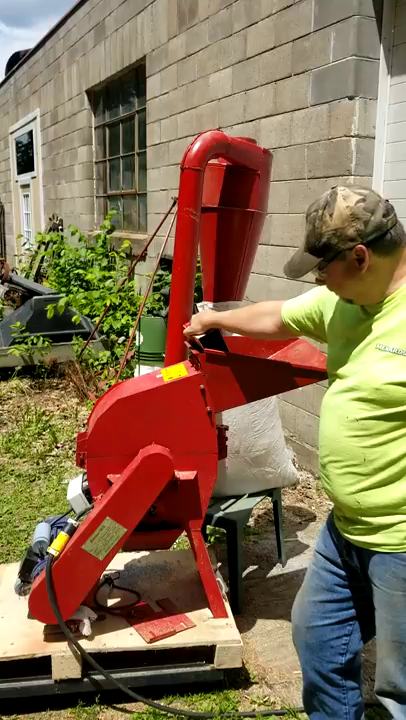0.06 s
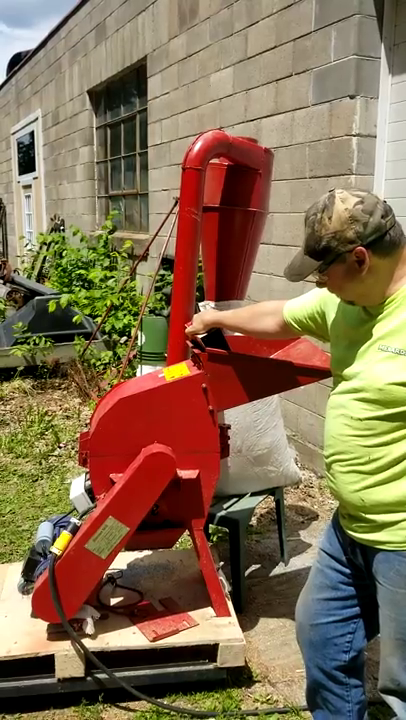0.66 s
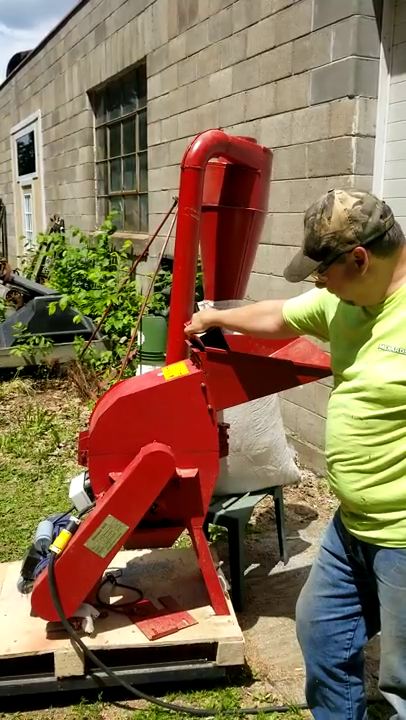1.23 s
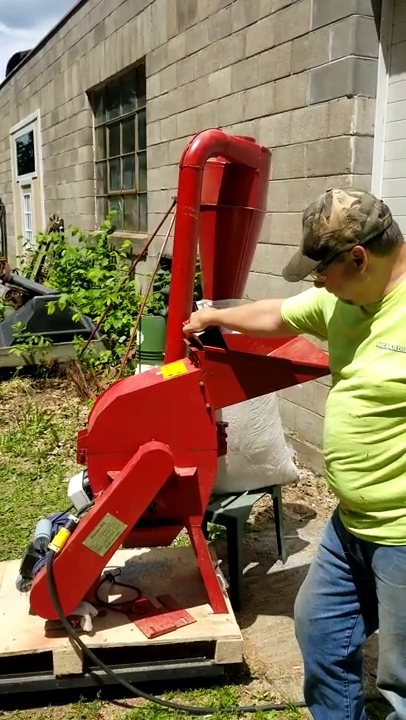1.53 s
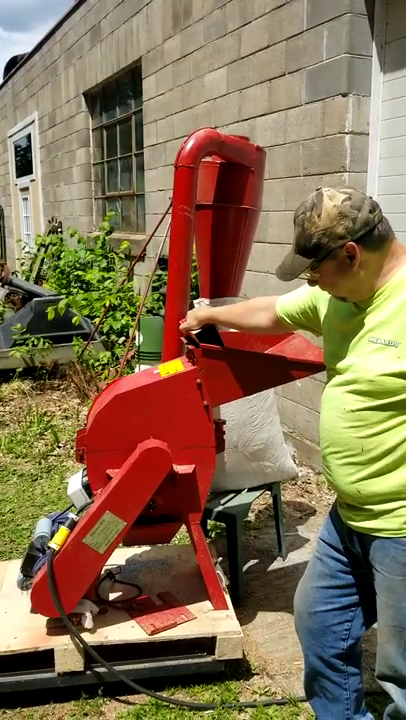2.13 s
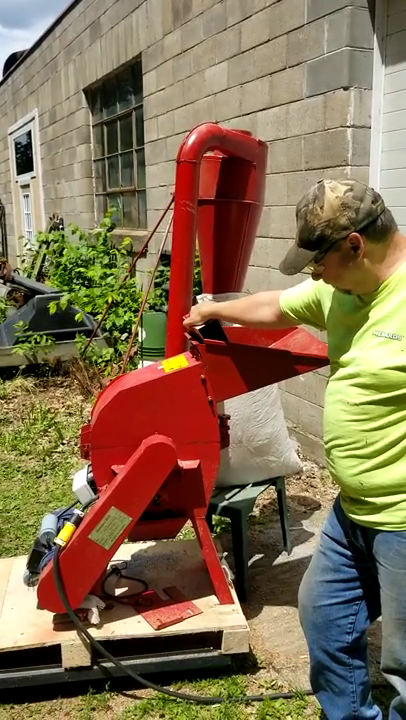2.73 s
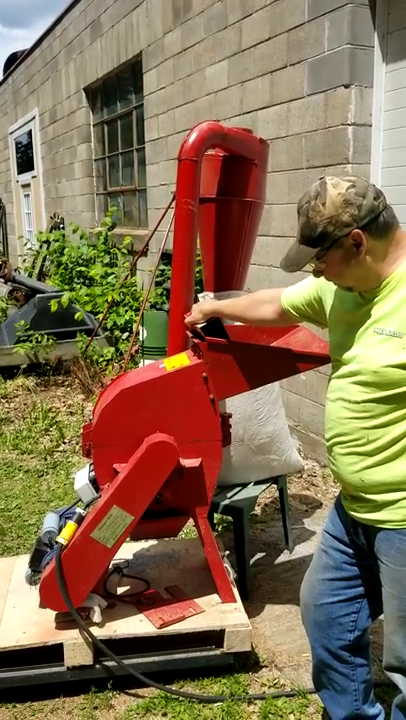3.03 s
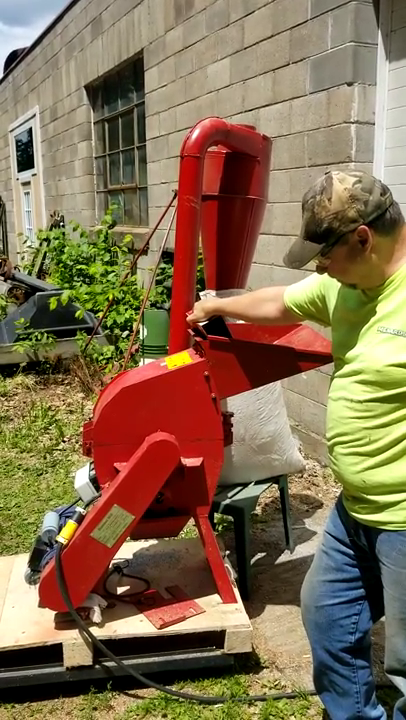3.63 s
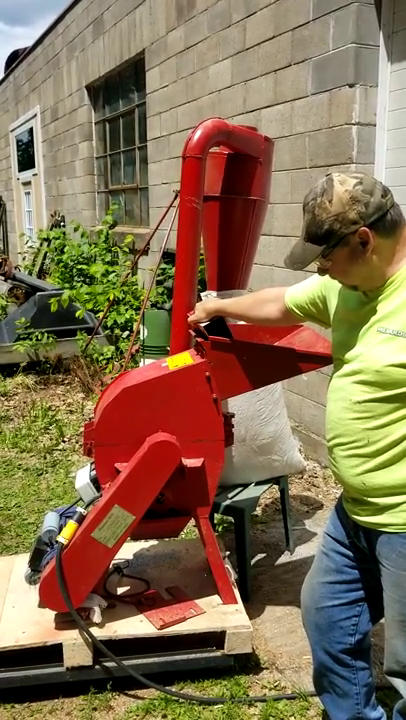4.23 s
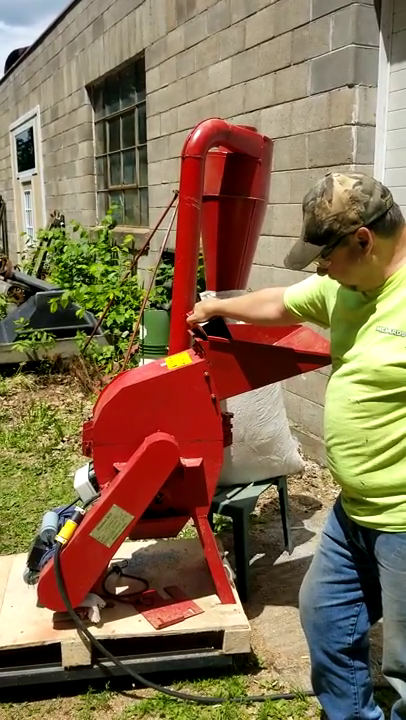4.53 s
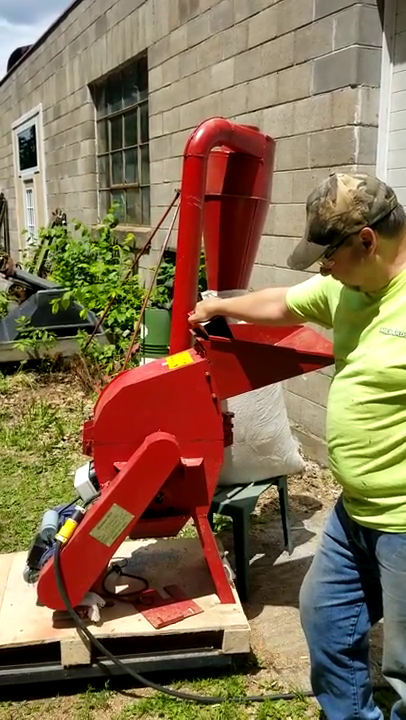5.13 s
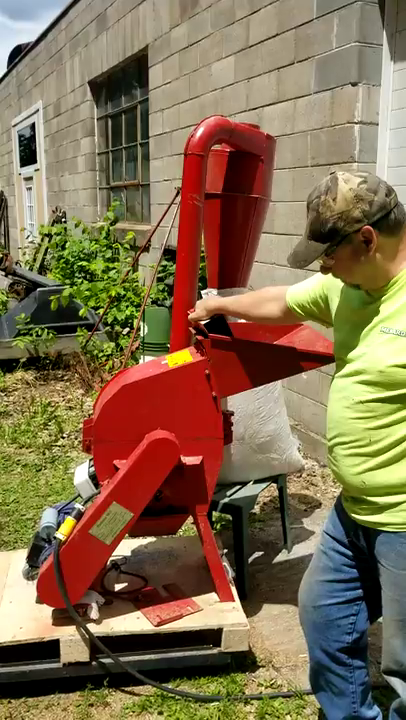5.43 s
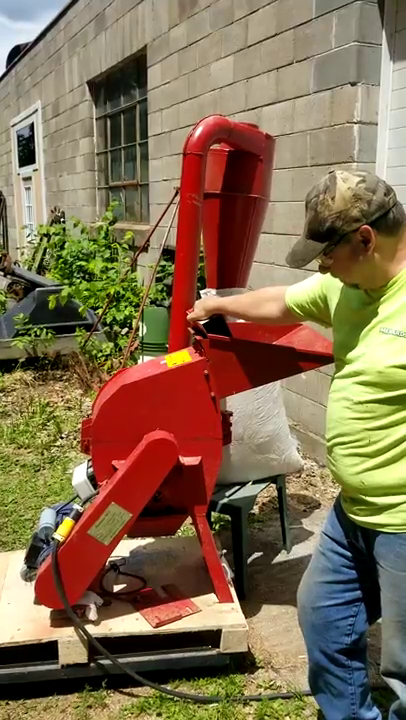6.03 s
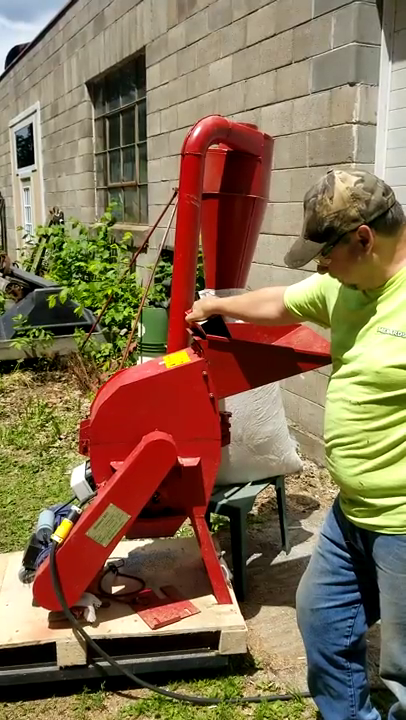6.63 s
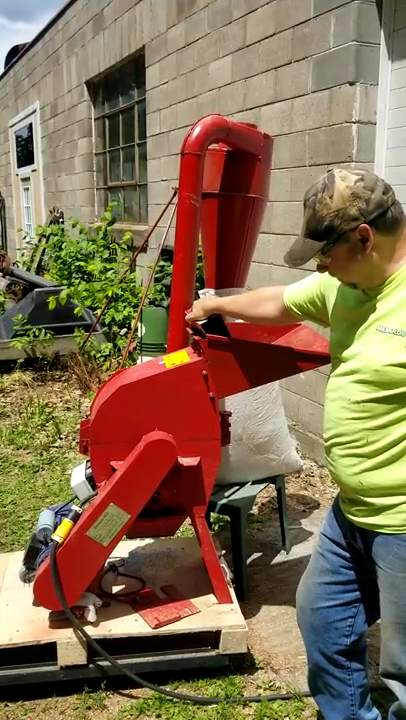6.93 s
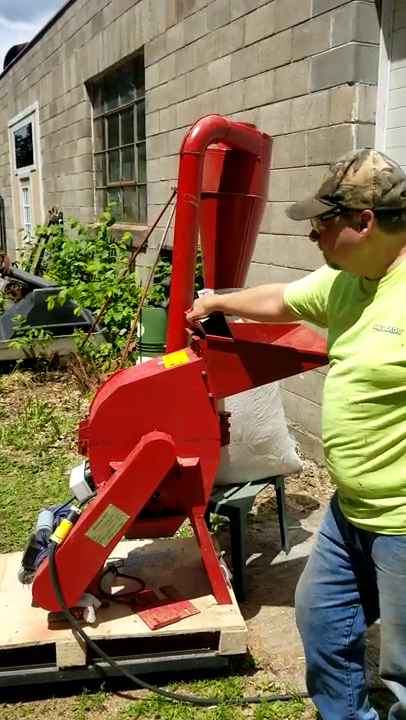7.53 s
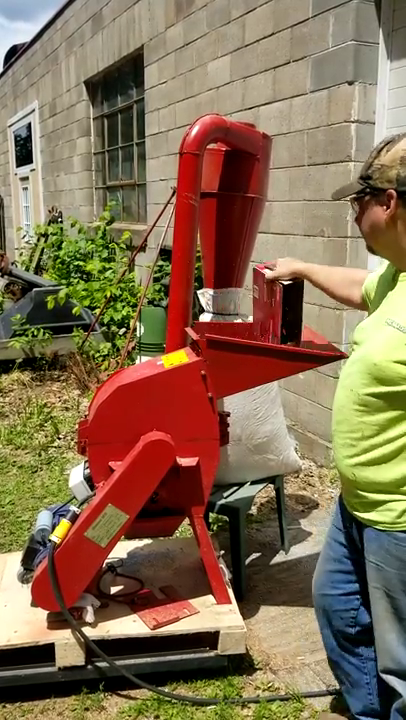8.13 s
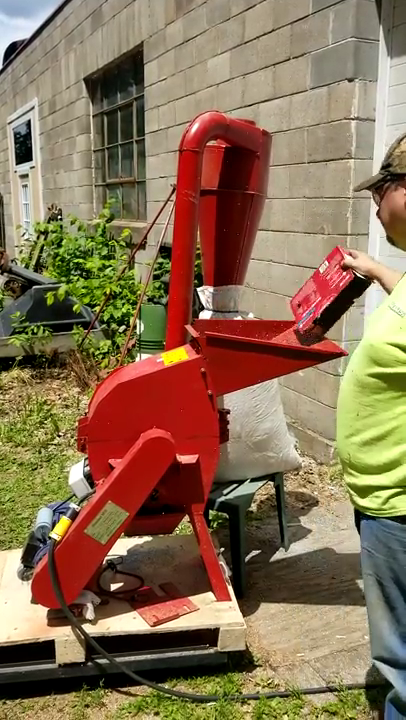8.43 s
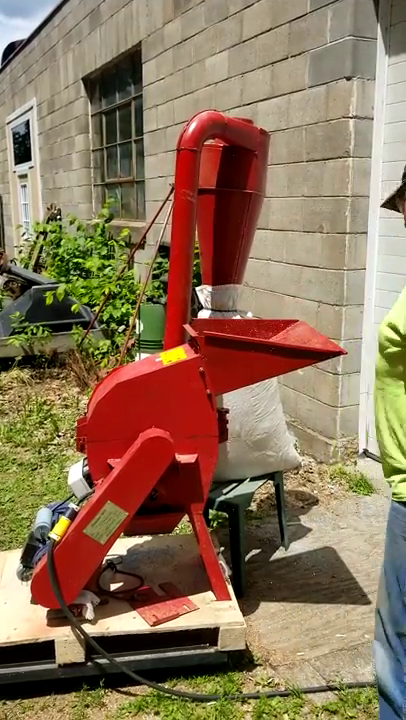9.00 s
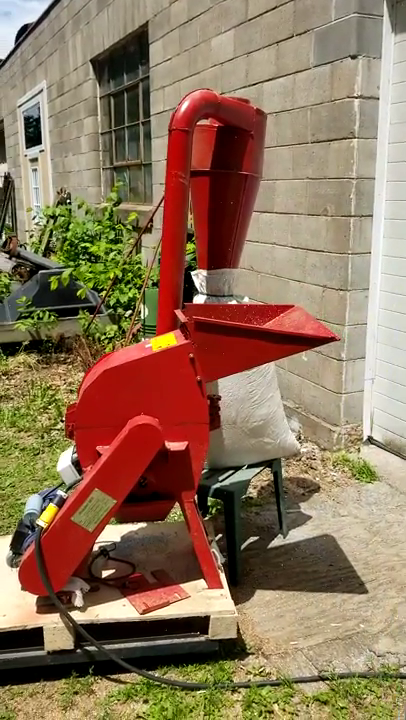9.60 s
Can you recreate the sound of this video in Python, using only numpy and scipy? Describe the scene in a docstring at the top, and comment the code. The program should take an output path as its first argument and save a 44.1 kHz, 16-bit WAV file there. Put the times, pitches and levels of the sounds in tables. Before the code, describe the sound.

A constant pitched drone comes from an electric hammer mill a few metres away in a yard, blended with a low roar of air, hissing sawdust and faint wavering motor tones. It holds nearly unchanged for most of the time. Late on, the hopper is uncovered and the higher tones of the hum stand out more, while the overall level drops for roughly a second before recovering.

```python
"""The rotor of an electric hammer mill hums outdoors, a few metres away, on the harmonics of its shaft.
Sawdust hisses up the resonant blower pipe, turbulent air roars in the steel housing,
and the motor adds mains hum and thin bearing tones. Near 8 s a box is lifted off the hopper,
which frees the upper hum; then the whole level sinks for about a second and comes back."""
import sys
import numpy as np
from scipy import signal
from scipy.fft import rfft, irfft
from scipy.io import wavfile
from scipy.ndimage import uniform_filter1d

SR = 44100
rng = np.random.default_rng(int(sys.argv[2]) if len(sys.argv) > 2 else 0)


def persist_wave(psi):
    """Save psi, clipped to +-1, as 16-bit WAV."""
    counts = np.round(np.clip(psi, -1, 1) * 32767).astype(np.int16)
    wavfile.write(sys.argv[1], SR, np.atleast_2d(counts).T)


N = 430406
T = np.arange(N) / SR
FREQS = np.arange(N // 2 + 1) * SR / N
EAR_LAG_S = 0.00013  # difference in arrival time between the ears


def rotor(opening, flutter_db=0.48, sway_db=0.36, throb_db=2.0, jitter_rad=0.01, right_ring_share=0.28):
    """Periodic forcing: hammers and fan blades chop the air into shaft orders that turbulence shakes."""
    # shaft speed: (time [s], rotation rate [Hz])
    speed = [(0, 77.2), (2, 77.53), (4, 77.48), (7.5, 77.55), (8.6, 77.43), (9.76, 77.6)]
    # change in the fan's whine, from the twelfth order up: (time [s], level [dB])
    whine = [(0, 0.5), (2.1, 2), (5, -1), (7.45, 0), (7.85, -5.5), (8.05, 3), (9.76, 1.5)]
    # shaft harmonics: (order, left level [dB], right level [dB],
    # left change with the hopper open [dB], right change with the hopper open [dB])
    orders = [(1, -27, -26, -2, 0), (2, -16, -16.5, 1, 1.5), (3, -27.5, -35, -7, -6), (4, -2.5, -3, 1, 1.5),
              (5, -18.5, -25, 1, -2), (6, -2, -7.5, 1, 2), (8, -17, -20, 12, 2), (9, -31.5, -35, -4, -2),
              (12, -19.5, -14, 5.5, 2.5), (16, -40, -35, 0, 0), (20, -36, -43, 0, -2),
              (24, -31, -27.5, 3, -1)]
    turns = np.cumsum(curve(speed)) / SR
    angle = 2 * np.pi * turns + jitter_rad * walk(12)
    whine_db = curve(whine)
    out = np.zeros((2, N))
    for order, left_db, right_db, left_open_db, right_open_db in orders:
        hz = order * speed[0][1]
        is_whine, is_throb = order >= 12, order <= 2
        # the housing shifts each order in its own way, which smooths the blade pulses into a drone
        phase = order * angle + rng.uniform(0, 2 * np.pi)
        shake_db = flutter_db * walk(16) + sway_db * walk(2.014)
        shake_db += is_throb * throb_db * walk(9) + is_whine * whine_db
        ring_db = hopper_resonance(hz, opening)
        # the hum reaches the left ear first; the whine, reflected by the wall, the right
        lag = 2 * np.pi * hz * EAR_LAG_S * (-1 if is_whine else 1)
        left_gain = undb(left_db + left_open_db * opening + shake_db + ring_db)
        right_gain = undb(right_db + right_open_db * opening + shake_db + right_ring_share * ring_db)
        out[0] += left_gain * np.sin(phase)
        out[1] += right_gain * np.sin(phase - lag)
    return np.sqrt(2) * out


def hopper_resonance(hz, opening, shut_hz=470, open_hz=1280, width_hz=105, boost_db=9.5):
    """Air resonance: the mouth's boost in dB moves up in pitch as the gap widens, strongest half way."""
    mouth_hz = shut_hz * (open_hz / shut_hz) ** opening
    return boost_db * np.sin(np.pi * opening) * peak(hz, mouth_hz, width_hz)


def sawdust(opening, grain_spread_db=2.5, surge_db=0.12, flicker_db=0.54, direct=0.29, gain_db=18.0):
    """Random excitation: countless grains scour the steel and drive the resonances of the blower pipe."""
    # sawdust and air in the pipe: (frequency [Hz], left density [dB], right density [dB])
    hiss_spectrum = [(1110, -65.5, -65), (1334, -58, -62.5), (1560, -61.5, -65), (2050, -62.5, -63),
                     (3260, -65, -74.5), (4730, -62.0, -66), (5580, -66, -72.5), (6420, -63.5, -72.5),
                     (8060, -67.5, -78.2), (9420, -66, -62.5), (11640, -63.5, -61), (12400, -61, -58.5),
                     (14400.0, -62, -64.5), (15800.0, -64, -67)]
    # pipe resonances: (frequency [Hz], width [Hz], left boost [dB], right boost [dB])
    pipe_modes = [(1715, 190, 4, -0.5), (2780, 220, 0, 3.5), (5200, 200, 1, 2), (6660, 130, 1.5, .8),
                  (7200, 300, 2, 1.5), (13150, 400, 2.2, -0.5), (15500, 400, 6.5, 2)]
    # hollow note of the open hopper: (frequency [Hz], width [Hz], level against the hiss [dB])
    hollow_note = (1930, 220, -.5)
    hollow_hz, hollow_width_hz, hollow_db = hollow_note
    rush = np.minimum(opening / 0.25, 1)  # air rushes at full strength from a quarter open
    common = white()  # a small share reaches both ears alike
    out = []
    for ear in range(2):
        grains = rng.standard_normal(N) * undb(grain_spread_db * rng.standard_normal(N))
        excitation = rfft(grains / grains.std()) + direct * common
        pipe_gain = undb(sum(db[ear] * peak(FREQS, hz, width) for hz, width, *db in pipe_modes))
        stream = colour(excitation * pipe_gain * yard(), hiss_spectrum, ear)
        hollow = colour(white() * peak(FREQS, hollow_hz, hollow_width_hz), hiss_spectrum, ear)
        out.append((stream + rush * undb(hollow_db) * hollow) * undb(flicker_db * walk(12)))
    return np.array(out) * undb(gain_db + surge_db * walk(6))


def housing_roar(coherent_below_hz=760, gust_db=0.6, gain_db=18.5, own_share=0.2):
    """Turbulence noise: air booms in the housing, and its long waves reach both ears nearly coherent."""
    # air in the housing: (frequency [Hz], left density [dB], right density [dB])
    roar_spectrum = [(20, -87.7, -86.8), (50, -77, -71.8), (100, -65, -69), (146, -53.2, -53.5),
                     (198, -62, -70), (266, -56.5, -59.5), (355, -53, -52), (447, -60.5, -62),
                     (537, -64.5, -64), (590, -52, -67), (620, -61, -72), (726, -61, -70.5),
                     (863, -60, -61), (1085, -62, -62.5)]
    coherence = np.sqrt(1 - own_share ** 2) / (1 + (FREQS / coherent_below_hz) ** 4)
    left = white()
    delayed = left * np.exp(-2j * np.pi * FREQS * EAR_LAG_S)
    right = coherence * delayed + np.sqrt(1 - coherence ** 2) * white()
    roar = np.array([colour(left, roar_spectrum, 0), colour(right, roar_spectrum, 1)])
    return roar * undb(gain_db + gust_db * walk(8))


def motor(waver_db=2.5, drift=0.00071):
    """Amplitude and phase modulation: mains hum and thin bearing tones each waver on their own."""
    # motor and bearing tones: (frequency [Hz], left level [dB], right level [dB])
    tones = [(46, -46, -45), (120.3, -29, -38), (241.2, -25.5, -26.5), (665.5, -25, -40), (759, -33, -37),
             (835, -33, -35), (1193, -32.5, -31), (1308, -32, -36), (1664, -32, -44), (2150, -39, -43),
             (2510, -36, -29.5), (4070, -38, -44)]
    out = np.zeros((2, N))
    for hz, left_db, right_db in tones:
        phase = hz * (2 * np.pi * T + drift * walk(4))
        tone = np.sin(phase) * undb(waver_db * walk(7))
        out += np.sqrt(2) * undb([[left_db], [right_db]]) * tone
    return out


def yard(share=0.29, first_s=0.004, decay_s=0.004):
    """Interference: frequency response of the direct path plus echoes from wall, ground and machine."""
    echoes = rng.standard_normal(N) * (T > first_s) * np.exp(-np.minimum(T / decay_s, 20))
    return (1 + share * rfft(echoes / np.linalg.norm(echoes))) / np.sqrt(1 + share ** 2)


def dip(start_s, end_s, depth_db, fall_s, recovery_s, sudden_share=0.14):
    """Exponential relaxation: a level in dB steps down, settles lower and eases back after the end."""
    fall = (T > start_s) * (1 - (1 - sudden_share) * np.exp(-np.maximum(T - start_s, 0) / fall_s))
    return -depth_db * fall * np.exp(-np.maximum(T - end_s, 0) / recovery_s)


def colour(spectrum, table, ear):
    """Spectral shaping: noise takes one ear's relative densities, with steep skirts past their ends."""
    hz, *density_db = np.transpose(table)
    f = np.maximum(FREQS, 1)
    gain = undb(np.interp(np.log(f), np.log(hz), density_db[ear]))
    skirts = np.sqrt((1 + (hz[0] / f) ** 30) * (1 + (f / hz[-1]) ** 30))
    return irfft(spectrum * gain / skirts, N) * np.sqrt(SR / 2)


def peak(f, hz, width):
    """Resonance: the power response of one mode, 1 at its centre."""
    return 1 / (1 + (2 * (f - hz) / width) ** 2)


def white():
    """White noise: a random spectrum with equal mean power at every frequency."""
    return (rng.standard_normal(len(FREQS)) + 1j * rng.standard_normal(len(FREQS))) * np.sqrt(N / 2)


def walk(rate):
    """Random modulation: steps smoothed twice, with a spread near 1 and about `rate` swings a second."""
    hold = int(SR / (2 * rate))
    steps = np.repeat(rng.standard_normal(N // hold + 1), hold)
    return 1.3 * uniform_filter1d(uniform_filter1d(steps, hold), hold)[:N]


def curve(table):
    """Linear interpolation: rows of (time [s], value) at every sample."""
    return np.interp(T, *np.transpose(table))


def undb(db):
    """Logarithmic level: decibels to amplitude gain."""
    return 10 ** (np.asarray(db) / 20)


def scene(lift_start_s=7.72, lift_length_s=0.69):
    """Superposition: rotor, motor, roar and hiss of the one machine add up and swell together."""
    # the machine's slow swell with the flow of wood: (time [s], level [dB])
    swell = [(0, -19), (1.6, -19), (2.05, -18), (3.9, -17.5), (5, -18.5), (7.3, -19), (7.9, -18),
             (9.76, -18.5)]
    opening = np.clip((T - lift_start_s) / lift_length_s, 0, 1)  # the box comes off in one even pull
    machine = rotor(opening) + motor() + housing_roar() + sawdust(opening)
    return undb(curve(swell)) * machine


def record(dry, cutoff_hz=15900):
    """Attenuation: the level dips for an instant and for a second, and a low-pass cuts the top treble."""
    # dips in level: (start [s], end [s], depth [dB], fall time [s], recovery time [s])
    dips = [(7.99, 9.1, 7.0, .28, .23), (8.001, 8.011, 6, .002, .002)]
    gain = undb(sum(dip(*row) for row in dips))
    lowpass = signal.ellip(12, 0.1, 90, cutoff_hz, fs=SR, output="sos")
    return signal.sosfilt(lowpass, dry * gain)


dry = scene()
out = record(dry)
persist_wave(out)
```